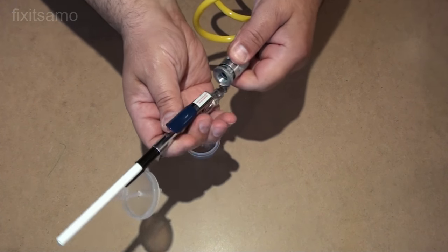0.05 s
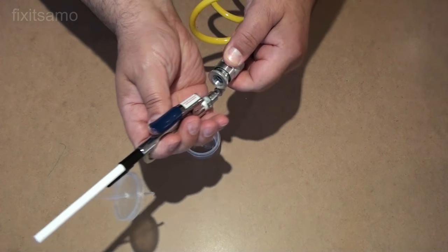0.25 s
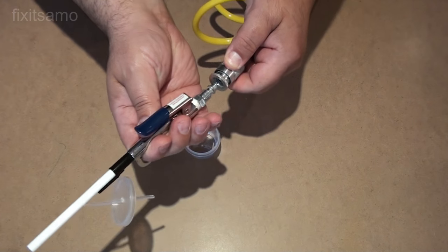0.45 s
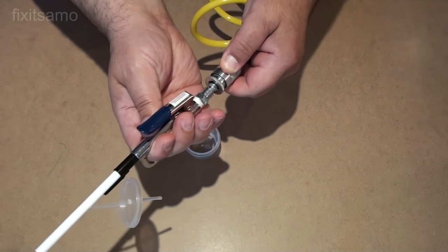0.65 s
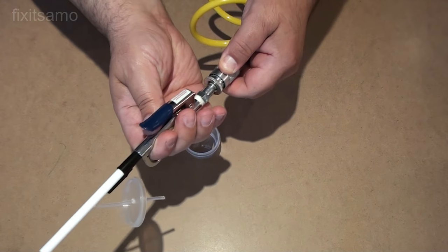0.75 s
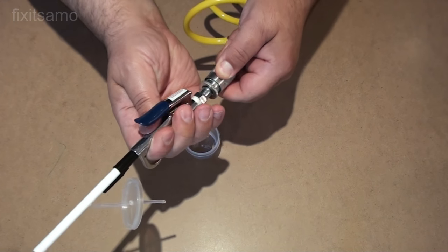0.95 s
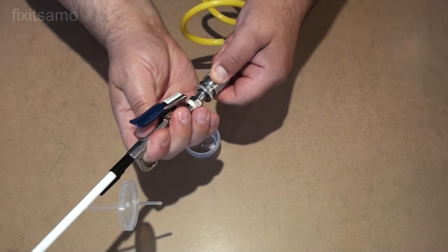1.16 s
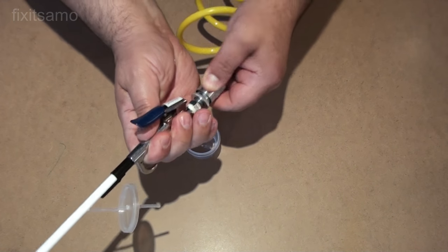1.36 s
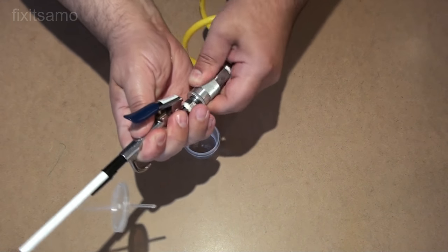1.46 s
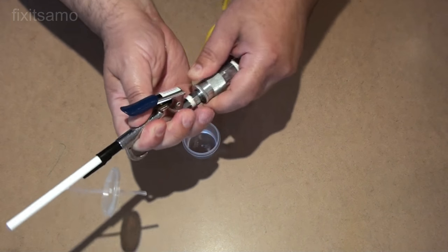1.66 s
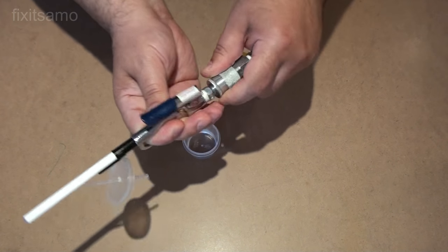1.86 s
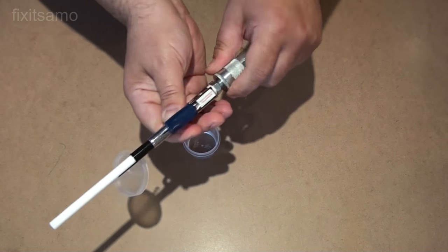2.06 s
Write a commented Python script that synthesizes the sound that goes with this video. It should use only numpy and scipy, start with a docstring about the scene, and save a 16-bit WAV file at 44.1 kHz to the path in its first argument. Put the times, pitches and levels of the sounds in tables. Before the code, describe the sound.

Close up in a small, slightly echoing room, a quick-connect air coupler gives a run of metal clicks, then a sharp snap and a brief burst of hissing air that cuts off. A few small metal ticks come after.

```python
"""A quick-connect air coupler snaps and lets out a short hiss of compressed air in a small hard room. First it
is worked by hand onto the steel plug of a blow gun: the plug ticks against its mouth, then clicks and scrapes
past the locking balls. Each click is a tiny crack plus ringing metal. At the snap, air rushes out with a low
puff and a thump until the valve shuts. A soft knock and a few handling ticks follow. The room echoes it all,
over quiet noise and a faint hum."""
import sys
import numpy as np
from scipy import signal
from scipy.fft import rfft, irfft, next_fast_len
from scipy.io import wavfile

SR = 44100
rng = np.random.default_rng(int(sys.argv[2]) if len(sys.argv) > 2 else 0)


def materialize(psi):
    """Save the field psi as 16-bit PCM at rate SR to the path in sys.argv[1].

    A 1-D psi becomes a single channel; in a 2-D psi each row is a channel.
    """
    bounded = np.clip(np.atleast_2d(psi).T, -1, 1)
    quanta = np.round(bounded * 32767).astype(np.int16)
    wavfile.write(sys.argv[1], SR, quanta)


N = 93095
TIME = np.arange(N) / SR
# the tone the coupler's body gives to a click or a scrape: (frequency [Hz], relative level [dB])
BODY_TONE = [(400, -22), (1400, -8.5), (2100, -2.5), (2700, 5), (3150, -3.5), (4300, 1.5), (5400, -9.5),
             (6900, 1.5), (8400, -7.5), (9700, -15), (11600, -11.5), (13500, -18), (16000, -32)]
# the bright tone of metal hitting metal: (frequency [Hz], relative level [dB])
CONTACT_TONE = [(100, -28), (600, -21.5), (1500, -3.5), (3000, 1.5), (7000, -2), (12000, -2), (16000, -16)]


def amp(db):
    """Turns decibels into a number to multiply a sound by."""
    return 10 ** (np.asarray(db) / 20)


def unit(x):
    """Scales a signal so that its average strength (rms) is 1."""
    return x / np.sqrt(np.mean(x ** 2) + 1e-20)


def read(points, hz):
    """Looks up frequencies in a table, sliding between its rows on a pitch-like (log) scale."""
    table_hz, value = np.transpose(points)
    return np.interp(np.log(hz + 1), np.log(table_hz + 1), value)


def colour(x, points):
    """Turns lows and highs up or down by a table of (frequency [Hz], gain [dB])."""
    size = next_fast_len(len(x) + 2048)
    gain = amp(read(points, np.fft.rfftfreq(size, 1 / SR)))
    return irfft(rfft(x, size) * gain, size)[:len(x)]


def noise(tone):
    """Steady noise of strength 1 with the given tone."""
    return unit(colour(rng.standard_normal(N), tone))


def wander(hz):
    """A smooth random wobble of strength 1, moving at up to about the given rate."""
    return unit(irfft(rfft(rng.standard_normal(N)) / (1 + (np.fft.rfftfreq(N, 1 / SR) / hz) ** 4), N))


def add(mix, start_s, sound):
    """Mixes a sound in at the given time."""
    part = mix[max(round(start_s * SR), 0):][:len(sound)]
    part += sound[:len(part)]


def stereo(mid, side):
    """Makes left and right from what both share (mid) and what sets them apart (side)."""
    return np.array([mid + side, mid - side])


def background():
    """Quiet room noise with a faint wavering hum."""
    # tone of the room noise: (frequency [Hz], relative level [dB])
    tone = [(15, -36), (25, -9.5), (145, -2.5), (190, -11.5), (229, -4), (591, -7.5), (840, -8.5),
            (1070, -11), (1290, -7), (1480, -9.5), (2160, -14.5), (2990, -15.5), (4740, -21.5),
            (12500, -27.5), (16000, -28.5)]
    # how wide it sounds: (frequency [Hz], side gain [dB])
    width = [(50, -20), (150, -14), (600, -4), (3000, -4), (9000, -4), (13000, -26)]
    # its slow rise and fall: (time [s], level [dB])
    levels = [(0, -55.5), (.35, -54.5), (.7, -57), (1.25, -55.5), (1.9, -58.5), (2.11, -58)]
    # notes of the hum: (frequency [Hz], level [dB])
    hum_notes = [(118, -68), (142, -76), (240, -70.5)]
    sound = stereo(noise(tone), colour(noise(tone), width))
    sound *= amp(np.interp(TIME, *np.transpose(levels)))
    for hz, db in hum_notes:
        note = np.sin(2 * np.pi * hz * TIME + 0.49 * wander(hz=5.6))
        sound += amp(db) * unit(note * (1 + .4 * wander(hz=8.3)))
    return sound


def room_tail():
    """Many small echoes off hard walls, each range of pitch dying away at its own speed."""
    # how long the room rings: (frequency [Hz], time to fade by 60 dB [s])
    fade_times = [(100, 0.28), (400, 0.75), (1000, 0.46), (2700, 0.47), (4500, 0.54), (7300, 0.51),
                  (11000, 0.35), (16000, 0.24)]
    # tone of the echoes: (frequency [Hz], gain [dB])
    tone = [(100, -11), (500, -1), (2500, 0.5), (5000, -2), (10000, -4.5), (16000, 3)]
    first_echo_s = 0.0032
    echoes = rng.standard_normal(SR) * (rng.random(SR) < .2) * (TIME[:SR] > first_echo_s)
    hz, t, spectrum = signal.stft(echoes, SR, nperseg=256)
    fade = amp(-60 * t / read(fade_times, hz)[:, None])
    tail = signal.istft(spectrum * fade, SR, nperseg=256)[1]
    return colour(tail / np.linalg.norm(tail), tone)


def room(x):
    """The room's echo of a sound, spread only a little to left and right."""
    # how wide the echo sounds: (frequency [Hz], side gain [dB])
    width = [(100, -17), (700, -7), (2500, -13.5), (5000, -9), (10000, -3.5), (11500, -18)]
    tails = stereo(room_tail(), colour(room_tail(), width))
    return signal.fftconvolve(x[None], tails, axes=1)[:, :N]


def strikes(hits, crack_tone, crack_fade_s, notes=()):
    """Each hit is a short crack plus any ringing notes; where it lands sets how strong four bands are."""
    # middles of the four bands, from low to high: (frequency [Hz])
    bands_hz = [2600, 4300, 7000, 11000]
    crack_db, rise_s, grip_detune = 2, 0.00051, .008
    sound, t = np.zeros(N), TIME[:2048]
    hz = np.fft.rfftfreq(2 * len(t), 1 / SR)
    bands = np.array([np.interp(hz, bands_hz, row) for row in np.eye(len(bands_hz))])
    for start_s, *levels_db in hits:
        crack = unit(colour(rng.standard_normal(len(t)), crack_tone))
        hit = crack * amp(crack_db - 60 * t / crack_fade_s)
        for note_hz, db, fade_s in notes:
            pitch_hz = note_hz * (1 + grip_detune * rng.standard_normal())
            hit += amp(db - 60 * t / fade_s) * np.sin(2 * np.pi * (pitch_hz * t + rng.random()))
        spectrum = rfft(hit * np.minimum(t / rise_s, 1), 2 * len(t))
        # bring the energy in each band to this hit's level
        energy_db = 10 * np.log10((bands > .5) @ abs(spectrum) ** 2 / len(t))
        gain = amp((np.array(levels_db) - energy_db) @ bands)
        add(sound, start_s, irfft(spectrum * gain)[:len(t)])
    return sound


def handling_ticks():
    """Small metal parts touch in the fingers and ring briefly."""
    # light touches: (time [s], level at 2.6, 4.3, 7 and 11 kHz [dB])
    hits = [(.0078, -27.5, -29, -46, -48), (.1545, -37, -27, -42, -33.5), (.1648, -43, -30, -46, -39),
            (.1831, -40, -32, -38, -31.5), (.1882, -32, -32, -48.5, -26), (.1979, -36, -24, -20.5, -47),
            (.2026, -29.5, -22.5, -27, -22.5), (.2114, -24, -29, -38, -26), (1.601, -18.5, -13.5, -27, -17),
            (1.6091, -25, -17, -17.5, -13), (1.7789, -41, -31, -20.5, -29.5), (1.8165, -32, -26, -37, -38),
            (2.0055, -47, -27.5, -33, -41), (2.0578, -35, -36, -29, -35), (2.063, -35, -38, -24, -37),
            (2.0982, -32.5, -45, -29.5, -46)]
    # notes of the small parts: (frequency [Hz], relative level [dB], time to fade by 60 dB [s])
    notes = [(3505, 2, 0.01), (4080, -5, 0.013), (6320, 0, 0.0065), (10070, -4, 0.015)]
    return strikes(hits, CONTACT_TONE, crack_fade_s=0.017, notes=notes)


def soft_knock():
    """A short, soft, hollow knock as the parts separate."""
    # tone of the knock: (frequency [Hz], relative level [dB])
    tone = [(1000, -22), (1800, -15), (2100, -2), (2450, -4.5), (4000, -20), (9000, -35)]
    peak_s, half_length_s, level_db = 1.586, 0.007, -40.5
    return amp(level_db) * noise(tone) * np.exp(-((TIME - peak_s) / half_length_s) ** 2)


def scrapes():
    """Metal slides on metal in many tiny slips that swell as the push builds."""
    # the slides: (start [s], length [s], top level [dB])
    slides = [(0.806, 0.017, -36), (0.823, 0.0087, -45.5), (0.931, .024, -35), (0.981, 0.021, -45)]
    slips_per_s = 9000
    level = np.zeros(N)
    for start, length, db in slides:
        level += amp(db) * np.interp(TIME, [start, start + 0.93 * length, start + length], [0, 1, 0])
    slips = rng.standard_normal(N) * (rng.random(N) < slips_per_s / SR)
    return level * unit(colour(slips, BODY_TONE))


def seating_knock():
    """The plug goes all the way in and knocks the whole blow gun, which rings once."""
    # low notes of the gun: (frequency [Hz], relative level [dB], time to fade by 60 dB [s])
    notes = [(367, -13.5, 0.12), (750, -2.5, 0.07), (1312, -3, 0.03), (1760, -4.5, 0.0197)]
    start_s, level_db = 0.95, -38
    age = np.maximum(TIME - start_s, 0)
    return sum(amp(level_db + db - 60 * age / fade_s) * np.sin(2 * np.pi * hz * age)
               for hz, db, fade_s in notes)


def plug_clicks():
    """The plug hits the inside of the coupler; the hand around it cuts the ringing short."""
    # hits of the plug: (time [s], level at 2.6, 4.3, 7 and 11 kHz [dB])
    hits = [(.574, -11.5, -16, -17.5, -29), (.7824, -11.5, -4.5, -8, -11), (.8251, -9.5, -6.5, -9.5, -24.5),
            (.8483, -21, -20.5, -21, -41), (.8993, -32, -16, -17.5, -37.5), (.9036, -28.5, -30, -32, -45),
            (.9082, -36, -28.5, -20, -43), (.9131, -34, -23.5, -35.5, -50), (.9177, -24, -27.5, -29, -46.5),
            (.9321, -18.5, -17, -18, -46.5), (.945, -22.5, -19.5, -24, -42.5),
            (.9476, -19.5, -15, -17, -43), (.9518, -15.5, -15, -19, -31), (.9548, -19, -11, -16, -17.5),
            (.9591, -9.5, -2, -3.5, -25), (.9612, -6.5, -13, -8, -22.5), (.9662, -18.5, -4, -14, -16)]
    # notes of the coupler: (frequency [Hz], relative level [dB], time to fade by 60 dB [s])
    notes = [(1630, -22, .009), (2150, -16.5, .009), (2668, 1.5, .012), (3860, 0, .007), (4360, -1, 0.012),
             (6730, -9, 0.0077), (7200, -2, 0.0096), (9470, -5, 0.014), (10100, -5, 0.012),
             (11500, 1, 0.0093), (12400, -8, .006)]
    return strikes(hits, BODY_TONE, crack_fade_s=0.022, notes=notes)


def thump():
    """The coupler kicks back into the hand as the pressure lets go: one dull, low note."""
    start_s, rise_s, fade_s, pitch_hz, level_db = 1.3585, 0.0016, 0.039, 180, -26.5
    age = np.maximum(TIME - start_s, 0)
    level = np.minimum(age / rise_s, 1) * amp(level_db - 60 * age / fade_s)
    return level * np.sin(2 * np.pi * pitch_hz * age)


def snaps():
    """Two sharp cracks: the sleeve snaps as the air breaks out, then the valve shuts."""
    # the two cracks: (time [s], level at 2.6, 4.3, 7 and 11 kHz [dB])
    hits = [(1.3525, -4, -10, -14, 8), (1.4775, -18, -5.5, 0.5, 4)]
    return strikes(hits, CONTACT_TONE, crack_fade_s=0.014)


def air_burst():
    """Air hisses out, with a few breathy pitched peaks, until the valve shuts.
    A low puff dies away as the pressure drops."""
    # tone of the hiss: (frequency [Hz], relative level [dB])
    hiss_tone = [(290, -44), (500, -13.5), (569, -28), (727, -40), (852, -27), (1100, -32), (1470, -13),
                 (1850, -22.5), (2110, -10.5), (2690, -16.5), (3490, -6.5), (3970, -10), (4150, -2.5),
                 (4460, -7), (5220, -6.5), (6480, -5.5), (12000, 2), (12900, -2), (15600, -17.5)]
    # breathy peaks in the hiss: (frequency [Hz], width [Hz], level [dB])
    hiss_peaks = [(860, 56, -49), (1590, 150, -42), (5310, 500, -36)]
    # tone of the low push of air: (frequency [Hz], relative level [dB])
    puff_tone = [(30, -32), (65, -22), (110, -1), (180, -6.5), (255, -2.5), (400, -14), (700, -16),
                 (2000, -37.5)]
    open_s, rise_s, shut_s, closing_s = 1.3435, 0.0067, 1.4823, 0.0068
    hiss_db, swell_db, flutter_db = -20, 1, 1.5
    puff_start_s, puff_rise_s, puff_db, puff_fade_db_per_s = 1.354, 0.0044, -28, 156.5
    opening = np.clip((TIME - open_s) / rise_s, 0, 1)
    closing = np.exp(-np.maximum(TIME - shut_s, 0) / closing_s)
    progress = np.clip((TIME - open_s) / (shut_s - open_s), 0, 1)
    hiss = noise(hiss_tone) * amp(hiss_db + swell_db * (progress - .5) + flutter_db * wander(hz=199))
    for hz, width, db in hiss_peaks:
        peak_filter = signal.iirpeak(hz, hz / width, SR)
        hiss += amp(db) * unit(signal.lfilter(*peak_filter, rng.standard_normal(N)))
    age = np.maximum(TIME - puff_start_s, 0)
    puff = noise(puff_tone) * np.minimum(age / puff_rise_s, 1) * amp(puff_db - puff_fade_db_per_s * age)
    return (hiss * opening + puff) * closing


def scene():
    """Metal and air in the middle, close by, with the room around them."""
    metal = plug_clicks() + seating_knock() + scrapes() + soft_knock() + handling_ticks()
    burst = air_burst() + thump() + snaps()
    echo = room(amp(db=-7.5) * metal + amp(db=-4) * burst)
    return metal + burst + echo + background()


def record(dry):
    """Cuts away the very highest treble."""
    cutoff_hz = 15780
    low_pass = signal.firwin(511, cutoff_hz, window=("kaiser", 9), fs=SR)
    return signal.oaconvolve(dry, low_pass[None], "same")


dry = scene()
out = record(dry)
materialize(out)
```